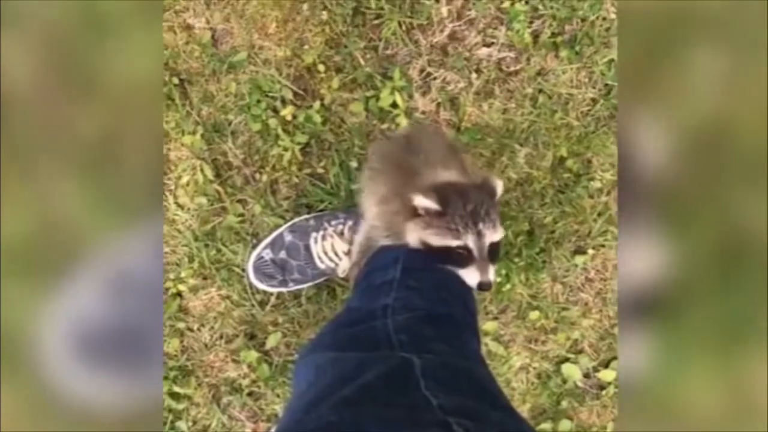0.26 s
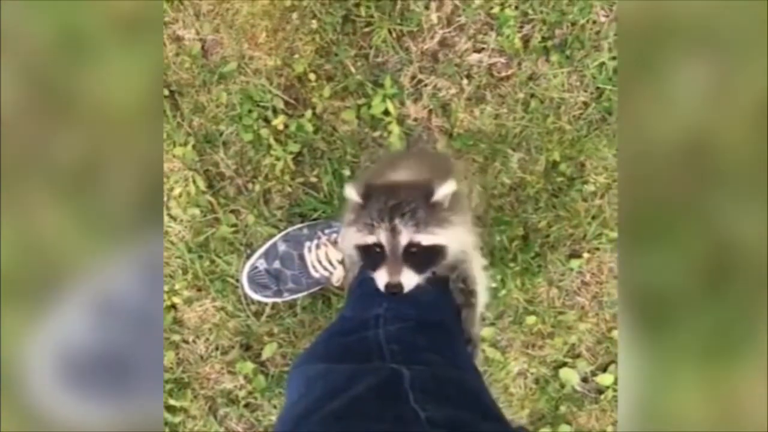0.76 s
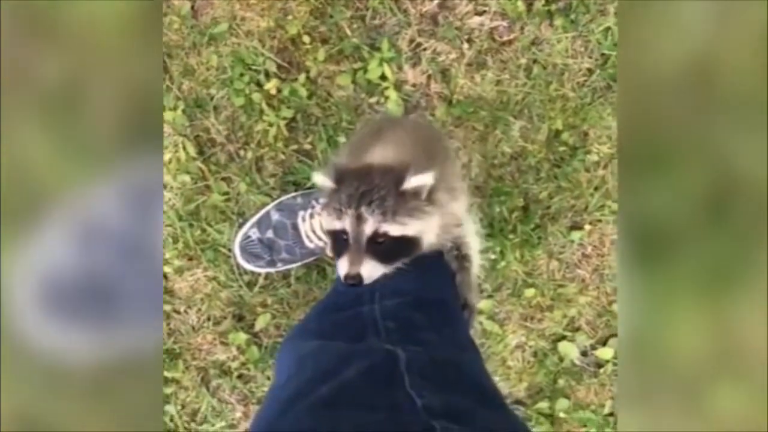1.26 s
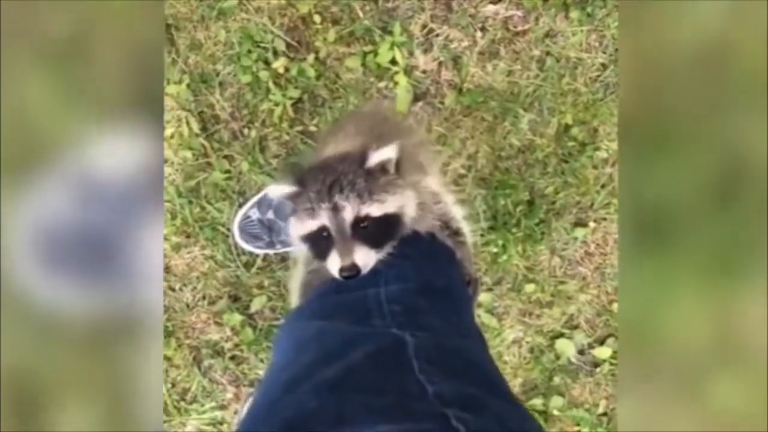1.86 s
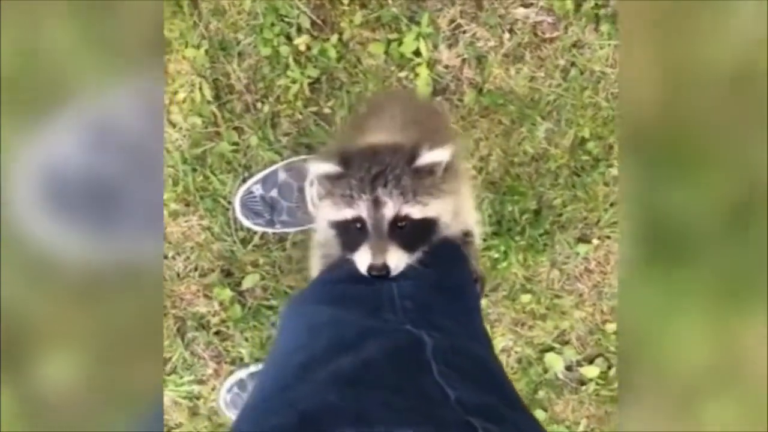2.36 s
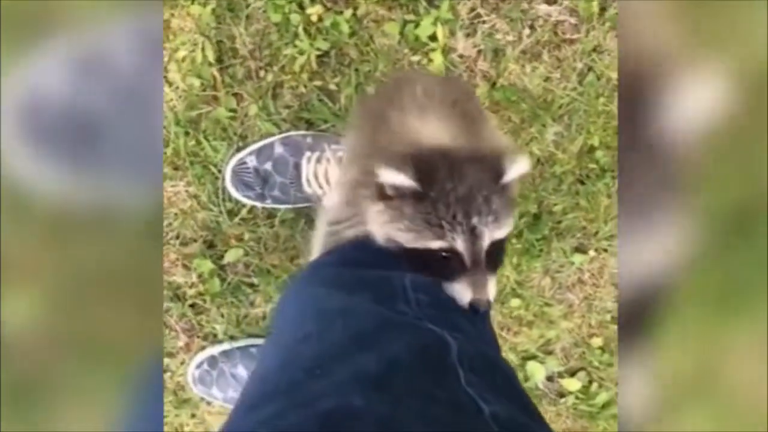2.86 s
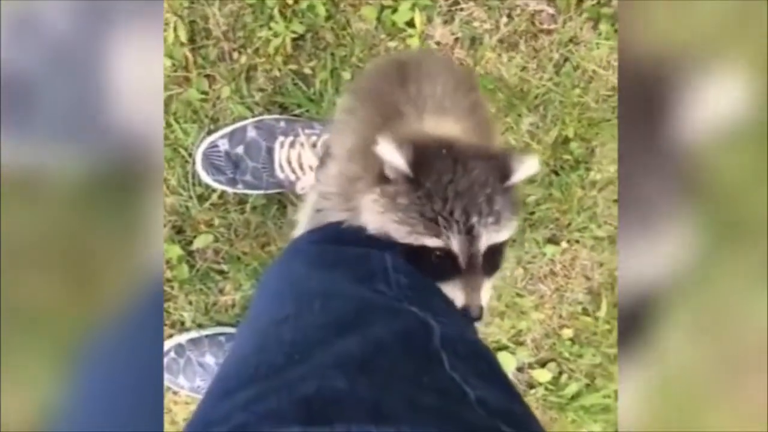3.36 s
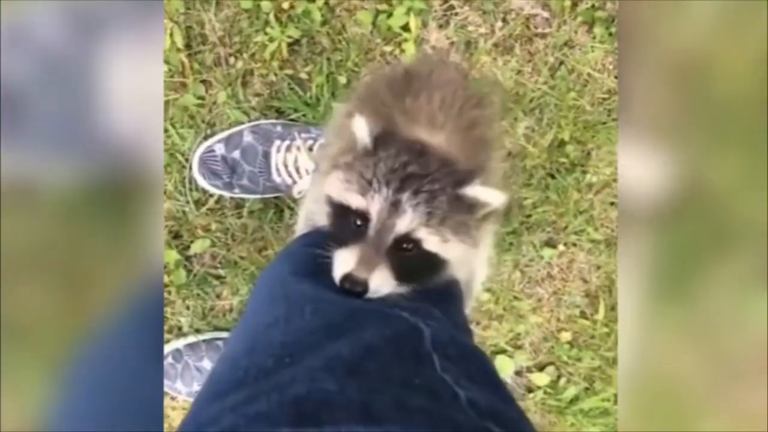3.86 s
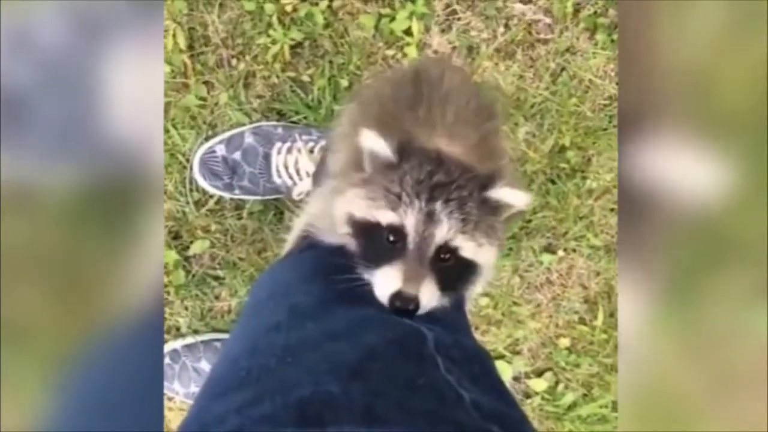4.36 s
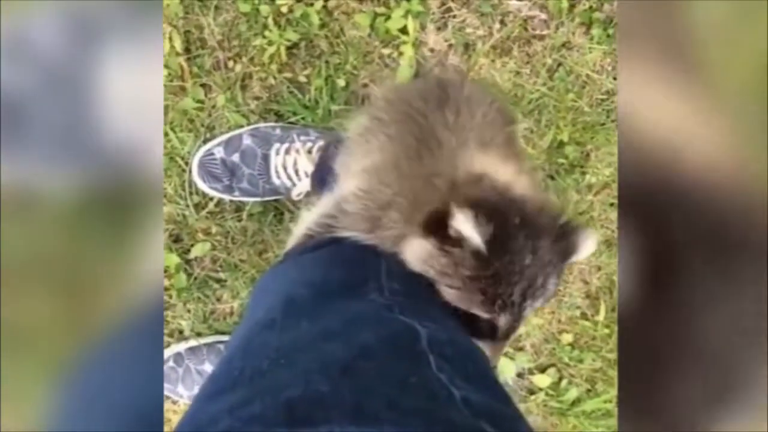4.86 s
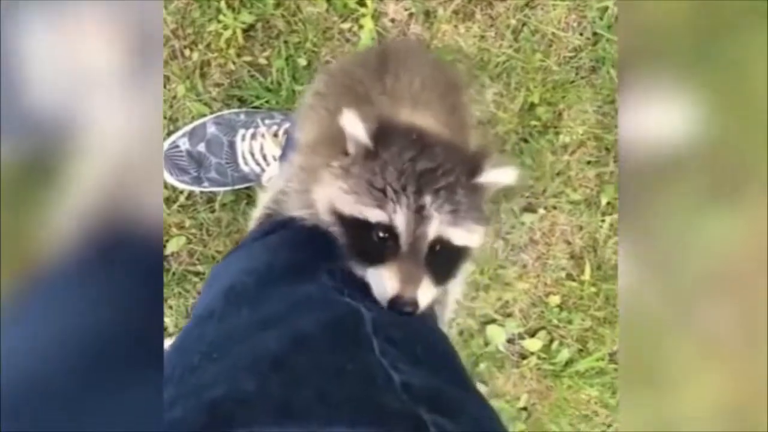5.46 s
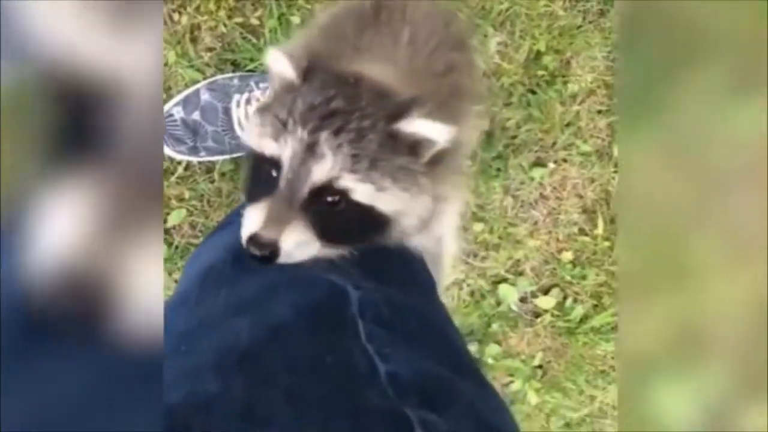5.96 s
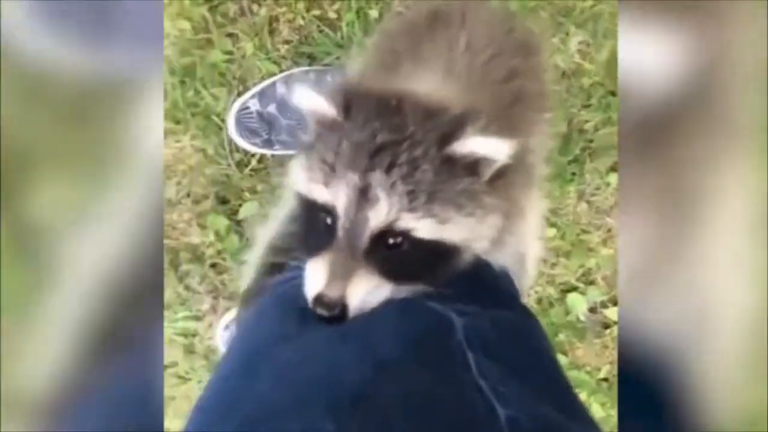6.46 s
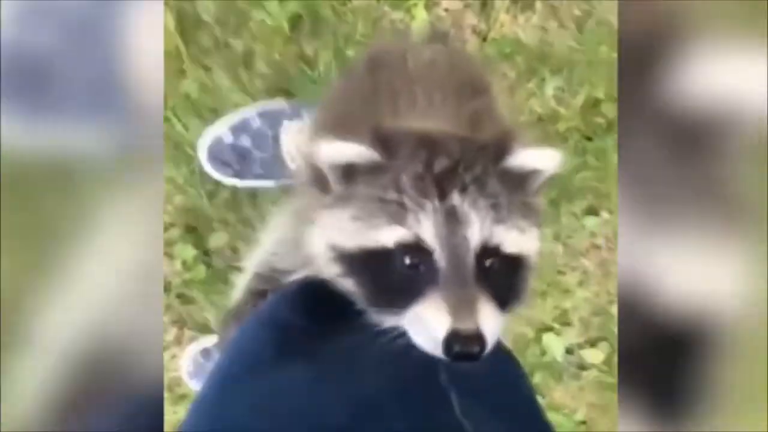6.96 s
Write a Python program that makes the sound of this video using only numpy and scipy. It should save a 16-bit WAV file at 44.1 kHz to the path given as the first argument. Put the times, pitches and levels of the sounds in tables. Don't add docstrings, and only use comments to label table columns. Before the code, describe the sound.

A young raccoon just below a phone microphone gives several short, fast-fluttering chitters mixed with thin squeaks, separated by quiet pauses. A longer trill follows, then a last, closer and louder call with a hard claw tick, a knock and a brief snort. Soft paw thuds on cloth, grass rustle, wind bumps and faint distant traffic sit around it.

```python
import sys
import numpy as np
from scipy import signal
from scipy.fft import rfft, irfft
from scipy.io import wavfile
from scipy.ndimage import uniform_filter1d

SR = 44100
rng = np.random.default_rng(int(sys.argv[2]) if len(sys.argv) > 2 else 0)


def file_out(sig):
    cols = np.atleast_2d(sig).T
    lim = np.clip(cols, -1, 1)
    pcm = np.round(lim * 32767).astype(np.int16)
    wavfile.write(sys.argv[1], SR, pcm)


def natural_amplitude(level_db):
    exponent = np.asarray(level_db, float) / 20
    return 10 ** exponent


N = 318402
TIME = np.arange(N) / SR

# [t/s, fundamental peak/dB, mouth ring peak/dB, pitch f/Hz]
SHORT_CALLS = [(.0479, -28.5, -34.5, 664), (.1029, -45, -49, 810), (.1538, -30, -35.5, 732),
               (.2088, -39.5, -46, 680), (.2607, -29.5, -30.5, 735), (.3188, -34.5, -34, 670),
               (.3724, -29.5, -32.5, 680), (.4306, -28, -34.5, 673), (.5042, -44, -38, 810),
               (1.0219, -52, -37, 674), (1.0732, -53, -22.5, 680), (1.1309, -29, -18, 655),
               (1.1988, -33.5, -23, 646), (2.5344, -41.5, -49, 650), (2.5814, -44, -42.5, 610),
               (2.636, -36, -37, 696), (2.6967, -38.5, -29.5, 792), (2.7571, -25, -23, 653),
               (2.8163, -36, -31.5, 650), (2.8743, -22, -21, 666), (2.936, -33.5, -33.5, 740),
               (3.4705, -40, -59, 647), (3.5179, -26.5, -32.5, 693), (3.579, -40.5, -33, 650),
               (3.6385, -26.5, -21, 618), (3.6905, -32, -25.5, 613), (3.7508, -26, -21, 603.5),
               (4.0442, -52, -50, 760)]
# [t/s, fundamental peak/dB, mouth ring peak/dB, pitch f/Hz]
TRILL = [(4.4103, -39.5, -41, 600), (4.45, -37.5, -31.5, 784), (4.5027, -40.5, -32.5, 653),
         (4.5536, -37.5, -24.5, 683), (4.6059, -37.5, -26, 674), (4.6583, -42, -23.5, 700),
         (4.7086, -35, -26, 692), (4.7611, -54, -46, 604), (4.8084, -34, -30, 668),
         (4.8608, -34.5, -33, 650), (4.9137, -36.5, -31.5, 658), (4.9671, -34.5, -33.5, 625),
         (5.029, -50, -37.5, 596), (5.0763, -37, -32.5, 643), (5.1347, -33.5, -34, 633),
         (5.195, -32, -34, 610), (5.248, -33.5, -27, 628), (5.304, -39.5, -26, 595),
         (5.36, -40.5, -25.5, 542), (5.3896, -52, -35, 746)]
# [t/s, fundamental peak/dB, mouth ring peak/dB, pitch f/Hz]
LAST_CALL = [(5.979, -39, -36.5, 627), (6.0344, -31, -23.5, 598), (6.0918, -26.5, -21, 604),
             (6.1502, -27.5, -25, 646), (6.2078, -24.5, -17.5, 634), (6.2649, -28, -27, 754),
             (6.3211, -29.5, -18, 587), (6.3783, -31.5, -21.5, 610), (6.4428, -31, -23.5, 620),
             (6.5055, -51, -44, 670), (6.5785, -33.5, -38, 750), (6.6386, -28, -26, 753),
             (6.699, -45, -28, 776), (6.827, -37, -26, 710)]
# [t/s, level/dB, mouth resonance f/Hz]
AIR = [
    [(0.0, -65, 1396), (0.362, -51, 1320), (0.55, -43, 1770)],
    [(1.0, -59, 1402), (1.132, -42, 1407), (1.26, -52, 1520)],
    [(2.5, -75, 1148), (2.78, -49, 1558), (3.0, -48, 1327)],
    [(3.45, -65, 1427), (3.666, -51, 1380), (3.76, -44, 1420), (3.82, -56, 1420)],
    [(4.38, -83, 1420), (4.476, -49, 1420), (4.67, -47, 1443)],
    [(4.67, -46.5, 1480), (5.11, -46.5, 1368), (5.21, -40.5, 1630), (5.45, -52.5, 1596)],
    [(5.95, -56, 1580), (6.16, -43, 1580), (6.2, -41, 2056), (6.27, -39, 2070), (6.38, -41.5, 1800),
     (6.818, -43.5, 1704), (7.0, -40, 2035)],
]
# [top of rasp f/Hz, rasp in flaps/dB, low rasp rel/dB, upper partials/dB]
RASPS = [(2000, -12, 2, 4), (2300, -19, -11, -12), (2200, -13, 1.5, -33), (2192, -17.5, -7, -12),
         (2270, -20.5, -4, -24), (3360, -12.5, -4.5, -5), (2453, -12, -3, -12)]
# [rise share, mouth glide/(Hz/s), rasp before the snap/dB,
# second and third partial/dB, delay/ms]
SNAPS = [(.5, -5000, -11, -14, .8), (.61, -12000, -9, -20, 1.2), (.4, -15000, -11, -14, -.6),
         (.5, -12000, -11, -14, .6), (.61, -8000, -11, -20, 1.2), (.61, -8000, -12, -9, 1.2),
         (.75, -30000, -13, -10, .8)]
# [flap length at -28 dB/ms, squeak octave rel/dB, mouth ring length share,
VOICING = [(8, -1, 1.26, 0.57, -12, -13), (9.5, -7, 1.3, 0.8, -9, -25), (3.5, -15, 1.43, 0.5, -18, -25),
           (6.5, -15, 0.94, 0.54, -15, -25), (10, -15, 1.43, 0.51, -10, -23), (11.5, 0, 1.2, 0.95, -3, -17),
           (5.5, 5.5, 1.1, 0.64, -30, -36)]
# [t/s, length/s, start f/Hz, end f/Hz, peak
# level/dB]
SQUEAKS = [(0.466, 0.049, 1454, 1510, -40.5), (0.489, 0.027, 1800, 1950, -36.5),
           (0.186, .02, 2450, 2350, -49), (1.014, 0.0099, 2040, 1880, -45), (1.050, 0.023, 1290, 1110, -36),
           (1.068, .011, 1130, 1500, -33), (1.096, 0.02, 1085, 1290, -46), (1.109, .023, 1440, 2000, -33),
           (1.151, 0.028, 1480, 1620, -35.5), (1.177, 0.023, 1410, 1900, -30.5),
           (1.213, 0.01, 1620, 1780, -44), (3.499, .028, 680, 700, -36), (3.634, .009, 5400, 5400, -52),
           (3.746, .01, 5400, 5400, -50), (4.83, .07, 4250, 4100, -54), (3.499, .028, 680, 700, -36),
           (3.634, .009, 5400, 5400, -52), (3.746, .01, 5400, 5400, -50)]
# [t/s, length/s, start f/Hz, end f/Hz, peak level/dB]
LATE_SQUEAKS = [(4.83, .07, 4250, 4100, -54), (4.485, .018, 1150, 1050, -45),
                (4.534, 0.026, 1087, 1150, -37.5), (4.584, 0.016, 1430, 1310, -39),
                (4.640, .028, 1158, 1203, -42), (4.68, 0.036, 1480, 1590, -37),
                (4.731, .038, 1390, 1135, -47), (4.74, .024, 2680, 2360, -46),
                (4.687, 0.02, 3055, 3220, -46), (4.683, 0.038, 4500, 4580, -46.5),
                (4.788, .02, 2750, 2660, -48), (4.78, .022, 3250, 3220, -47), (4.89, 0.02, 2680, 2590, -48),
                (5.055, .025, 3150, 3060, -48), (5.23, 0.024, 1380, 1360, -41),
                (5.283, 0.027, 1540, 1540, -38), (5.317, .054, 1526, 1443, -43),
                (6.014, .014, 1180, 1000, -52), (6.128, 0.026, 1240, 973, -42),
                (6.07, .018, 1200, 1020, -50), (6.185, .018, 1180, 1020, -47),
                (6.56, .025, 2330, 2250, -44), (6.36, 0.022, 1190, 1030, -37),
                (6.374, .016, 3350, 3300, -50), (6.493, .018, 3400, 3350, -51),
                (6.432, 0.011, 1160, 1040, -42), (6.493, .02, 1145, 1120, -42),
                (6.55, .032, 1100, 928, -46), (6.609, 0.044, 1220, 1143, -51),
                (6.798, .018, 2420, 2380, -33), (4.9, .02, 4150, 4100, -50), (5.34, .022, 2650, 2550, -44),
                (5.385, .04, 2750, 2600, -47)]
# [t/s, level/dB]
SPITS = [(.0479, -56), (.1538, -57), (.2607, -55), (.4306, -57), (1.1309, -54), (3.6385, -52),
         (3.7508, -52), (6.2078, -46), (6.287, -48), (6.3211, -49), (6.6386, -49)]
# [t/s, length/s, hiss level/dB, low body rel/dB]
SNORTS = [(2.306, 0.31, -71.5, 13.5), (6.685, 0.026, -42, -2), (6.699, 0.084, -23, 1.5),
          (6.757, 0.12, -41, 1.5), (6.84, 0.075, -47.5, 10.5), (6.888, 0.06, -45, 12.5),
          (3.627, 0.23, -57, 0.5), (-.4, .95, -56, -12)]
# [f/Hz, density/dB]
SNORT_COLOUR = [(880, -5), (1500, -5.5), (2140, -18), (2690, -13.5), (3170, -10.5), (4810, -15),
                (5600, -10), (7000, -15.5), (8000, -29), (11200, -32), (12000, -35), (15600, -52),
                (22000, -120)]
# [t/s, length/s, level/dB, centre f/Hz]
SCRATCHES = [(6.775, .065, -40, 6700), (6.87, .07, -48, 11300), (3.745, .012, -52, 7000),
             (3.633, .012, -54, 7500), (6.955, .03, -52, 8000), (6.69, .02, -46, 6300)]
# [t/s, peak level/dB, ring f/Hz, crack rel/dB]
TICKS = [(6.265, -13, 2240, -17), (6.277, -9, 2300, -23), (6.2768, -20, 7500, -30), (6.7305, -8, 800, -20),
         (6.735, -18, 1300, -20), (6.743, -24, 1300, -26), (6.755, -20, 1000, -26), (6.739, -21, 1050, -26),
         (6.749, -18, 1140, -25), (7.084, -32.5, 1800, -22)]
# [t/s, peak level/dB]
THUDS = [(2.4, -50.5), (2.754, -46), (2.873, -47), (4.041, -47.5), (4.87, -47), (5.802, -50),
         (6.271, -36.5), (6.637, -40), (6.72, -36), (7.087, -48)]
# [t/s, thump level/dB, rise/s, fall/s, flutter rel/dB]
WIND = [(0., -60, 0.038, 0.074, -4), (4.36, -38, 0.0057, 0.065, -44), (4.5, -23.5, 0.0087, 0.0065, -33),
        (4.6, -33.5, .025, 0.016, -47), (4.89, -28.5, 0.04, 0.024, -43), (5.5, -29.5, 0.03, .05, -23),
        (5.65, -27.5, 0.026, 0.024, -17), (5.83, -39.5, .025, 0.059, -14), (6.09, -39, 0.0077, .04, -29),
        (6.25, -29, 0.036, 0.038, -11), (6.5, -34.5, 0.036, 0.013, -13), (6.82, -38, 0.091, 0.038, -6),
        (6.91, -42, 0.032, 0.036, 5), (6.96, -44, 0.022, 0.0063, 7), (7.1, -42, 0.029, 0.017, -6)]
# [t/s, peak level/dB, f/Hz]
SLAPS = [(6.95, -18, 56), (7.095, -27, 62)]
# [t/s, rustle level/dB]
RUSTLE = [(0.0, -60), (.54, -61), (1.2, -60), (1.55, -61), (2.09, -59), (2.39, -55), (3.04, -57),
          (3.22, -62), (4.5, -62.5), (5.35, -54.5), (5.8, -58.5), (6.19, -54), (6.35, -46.5), (6.66, -53.5),
          (6.82, -50), (6.93, -44), (6.945, -57), (7.22, -60.5)]
# [f/Hz, density/dB]
RUSTLE_COLOUR = [(1180, -31), (2000, 2.5), (2410, -6), (2650, 0), (2860, -1.5), (4940, 0.5), (8050, 0.5),
                 (10300, -3), (13400, -20), (22000, -120)]
# [t/s, level/dB]
ROAD = [(0.0, -48), (.8, -52), (2.3, -54), (3.4, -54), (4.35, -55.5), (4.7, -52.5), (5.35, -55.5),
        (5.9, -52.5), (6.75, -53.5), (6.9, -55), (7.22, -61)]
# [f/Hz, density/dB]
TRAFFIC = [(240, -15.5), (400, -11.5), (577, -2), (623, -1.5), (748, -1), (1060, 1), (1730, -10),
           (1980, -15), (2240, -14.5), (4000, -20.5), (5200, -25), (8800, -120)]
# [t/s, level/dB]
DRONE = [(0., -68), (.9, -63), (1.2, -52.5), (1.6, -58), (2.4, -57.5), (2.9, -64), (3.3, -68), (4.1, -59),
         (4.4, -76), (7.22, -78)]
THINNED = [.195, .268, .509, .593, .865, .915, .955, 1.043, 1.447, 1.49, 1.594, 1.944, 2.03, 2.11, 2.555,
           2.645, 2.703, 2.937, 3.035, 3.065, 3.16, 4.697, 4.866, 5.195, 5.243, 5.327, 5.84, 6.079, 6.563,
           6.957, 7.015]
WORST_THINNED = [.865, .915, 2.645, 5.195]

HARD_SNAP_DB, HARD_RISE = -19, .35
FLAP_MS_PER_DB, MOUTH_SCATTER_HZ = 0.7, 61
OCTAVE_FADES_HZ, OCTAVE_DB_PER_KHZ = 1310, -40
SQUEAK_BEND, HIGH_ROUGH = .7, .42
AIR_SHUT_DB, AIR_LEAD_S = -9, .01
THUD_RISE_S, THUD_FALL_S = 0.0067, 0.011
CALM_DB, CALM_FLUTTER_DB = -49.5, -56
FINE_DB, FINE_SLOPE, FINE_FULL_DB = -69.5, 3.3, -57.5
MURMUR_DB, MURMUR_SLOPE = -61, 0.82
TRAFFIC_DB = 1
SPARED_HZ, SPARED_OVER_CALL_HZ = 1800, 148
TOP_HZ = 12100


def noise(colour):
    hz, db = np.transpose(colour)
    grid = np.log(np.fft.rfftfreq(N, 1 / SR) + 1)
    gain = natural_amplitude(np.interp(grid, np.log(hz), db, -120, -120))
    x = irfft(rfft(rng.standard_normal(N)) * gain, N)
    return x / x.std()


def walk(rate):
    k = int(SR / rate)
    held = np.repeat(rng.standard_normal(N // k + 1), k)
    return 1.3 * uniform_filter1d(uniform_filter1d(held, k), k)[:N]


def curve(table, column):
    rows = np.array(table)
    return np.interp(TIME, rows[:, 0], rows[:, column], -120, -120)


def add(out, s, piece):
    i = max(int(s * SR), 0)
    out[i:i + len(piece)] += piece[:N - i]


def swell(t, rise, fall):
    return 2 / (np.exp(np.clip(-t / rise, -50, 50)) + np.exp(np.clip(t / fall, -50, 50)))


def flaps(rough, phrase):
    out, t = np.zeros(N), np.arange(-1500, 2000) / SR
    resonance = np.max([curve(table, 2) for table in AIR], axis=0)
    rows = SHORT_CALLS + TRILL + LAST_CALL
    for (s, db, mouth_db, hz), c in zip(rows, rng.random((len(rows), 9))):
        row = phrase[int(s * SR)]
        top_hz, rough_db, _, upper_db = RASPS[row]
        flap_ms, _, ring_share, voice_rise, _, _ = VOICING[row]
        snap_rise, glide, early_db, partial_db, delay_ms = SNAPS[row]
        mouth_hz = max(resonance[int(s * SR)], 1180) + MOUTH_SCATTER_HZ * (2 * c[8] - 1)
        ms = flap_ms + FLAP_MS_PER_DB * (max(db, mouth_db - 10.0) + 28.0)
        flank = max(ms, 5.4) / 2630
        phase, turn = 2 * np.pi * hz * (t - 0.4 * t ** 2), 2 * np.pi * c
        opening = np.tanh(2.36 * swell(t, voice_rise * flank, 0.57 * flank))
        opening += natural_amplitude(-18.5) * swell(t, 0.012, 0.018)
        voice = natural_amplitude(db) * opening * np.sin(phase + turn[0])

        hard = mouth_db > HARD_SNAP_DB and row == 6
        held = ring_share * flank
        late = t - delay_ms / 1000 + .002 * hard
        snap = np.tanh(1.52 * swell(late, snap_rise * held * HARD_RISE ** hard, 0.31 * held * (1 + hard)))

        struck = 1 + .28 * np.cos(phase + turn[1])
        bend = glide * np.clip(t, -.02, .02) ** 2 / 2
        mouth = struck * np.sin(2 * np.pi * (mouth_hz * t + bend) + turn[2])
        mouth += natural_amplitude(partial_db) * (np.sin(2 * phase + turn[3]) + np.sin(3 * phase + turn[8]))
        mouth += .33 * np.sin(2 * np.pi * (mouth_hz + 700 * (c[3] - .5)) * t + turn[7])
        mouth += natural_amplitude(-20.5) * (mouth_hz < 1560) * np.sin(2 * np.pi * 2700 * t + turn[1])
        for k in (4, 5, 6):
            shut_db = -18 * (k * hz > 1.1 * top_hz)
            mouth += natural_amplitude(upper_db - 3.3 * (k - 4.0) + shut_db) * np.sin(k * phase + turn[k])

        voice += natural_amplitude(db - 35) * snap * np.sin(2 * np.pi * (3600 + 700 * c[8]) * t)
        voice += natural_amplitude(db - 20) * snap * np.sin(.62 * phase + turn[7])
        voice += natural_amplitude(db - 13) * snap * np.sin((1.25 + .25 * c[3]) * phase + turn[6])
        start = s + t[0]
        gate = swell(t, 0.0036, 0.0051) + natural_amplitude(early_db) * swell(t + 0.0097, 0.0077, 0.0082)
        breath = natural_amplitude(rough_db) * gate * np.roll(rough, -int(start * SR))[:len(t)]
        add(out, start, voice + natural_amplitude(mouth_db - 3.0) * (snap * mouth + breath))
    return out


def squeaks(phrase):
    out, shiver = np.zeros(N), walk(350) + 1j * walk(350)
    rows = SQUEAKS + LATE_SQUEAKS
    for (s, length, hz0, hz1, db), turn in zip(rows, rng.random(len(rows))):
        u = np.linspace(0, 1, int(length * SR))
        span = slice(int(s * SR), int(s * SR) + len(u))
        _, octave_db, _, _, _, third_db = VOICING[phrase[span.start]]
        octave_db += OCTAVE_DB_PER_KHZ * max(max(hz0, hz1) - OCTAVE_FADES_HZ, 0) / 1000
        rough = .07 if min(hz0, hz1) < 1270 else HIGH_ROUGH
        unsteady = 1 - rough + rough * shiver[span]
        hz = hz0 + (hz1 - hz0) * u ** SQUEAK_BEND
        spin = np.exp(2j * np.pi * (np.cumsum(hz) / SR + turn))
        tone = spin * unsteady
        tone += natural_amplitude(octave_db) * spin ** 2 * unsteady
        tone += natural_amplitude(octave_db + third_db) * spin ** 3
        out[span] += natural_amplitude(db) * np.sin(np.pi * u ** 1.3) ** .45 * tone.real
    return out


def rasp():
    sound, phrase = np.zeros(N), np.zeros(N, int)
    for k, (table, (top_hz, _, low_db, _)) in enumerate(zip(AIR, RASPS)):
        inside = (TIME >= table[0][0]) & (TIME < table[-1][0])
        colour = [(350, -30), (600, low_db - 4), (.46 * top_hz, low_db + 3), (.6 * top_hz, low_db - 1),
                  (.76 * top_hz, 0), (.86 * top_hz, -6), (.97 * top_hz, -1), (1.1 * top_hz, -25),
                  (1.25 * top_hz, VOICING[k][4]), (1.36 * top_hz, -30)]
        sound += inside * noise(colour)
        phrase += inside * k
    return sound, phrase


def air(wide):
    out, opening, t = np.zeros(N), np.zeros(N), np.arange(-2500, 2500) / SR
    for row in SHORT_CALLS + TRILL + LAST_CALL:
        add(opening, row[0] - AIR_LEAD_S + t[0], swell(t, 0.013, 0.01))
    narrow = signal.hilbert(noise([(1, 3), (200, -1), (500, -12), (800, -30)]))
    flutter = natural_amplitude(3.5 * walk(80) + 3.0 + AIR_SHUT_DB * (1 - np.minimum(opening, 1)))
    for table in AIR:
        cycles = np.cumsum(np.maximum(curve(table, 2), 0)) / SR
        ring = np.real(narrow * np.exp(2j * np.pi * cycles))
        out += natural_amplitude(curve(table, 1)) * flutter * natural_amplitude(-10.0) * (ring + wide)
    return out


def spits():
    shape = sum(natural_amplitude(db) * swell(TIME - s, .0012, .002) for s, db in SPITS)
    return shape * noise([(2600, -30), (3300, 0.5), (5500, -1), (8000, -7), (11000, -16)])


def snort():
    grain = natural_amplitude(2.2 * walk(400))
    hiss = grain * noise(SNORT_COLOUR)
    body = grain * noise([(100, -7.0), (300, 1.5), (700, 1.5), (1150, -8), (1600, -7.5), (2500, -7.5)])
    fizz = grain * noise([(6500, -30), (8000, 0.5), (11000, -2), (12200, -8)])
    out = np.zeros(N)
    for s, length, db, body_db in SNORTS:
        u = np.clip((TIME - s) / length, 0, 1)
        arch = np.sin(np.pi * u)
        breath = arch ** 1.24 * hiss
        breath += natural_amplitude(-14) * arch ** 2.6 * fizz
        breath += natural_amplitude(body_db) * np.sin(np.pi * u ** 1.08) ** 2.1 * body
        out += natural_amplitude(db) * (u < 1) * breath
    band = noise([(1, 0), (700, -3), (1300, -25)])
    for s, length, db, hz in SCRATCHES:
        stroke = np.sin(np.pi * np.clip((TIME - s) / length, 0, 1))
        out += natural_amplitude(db) * stroke * band * np.cos(2 * np.pi * hz * TIME)
    return out


def ticks():
    out, t = np.zeros(N), np.arange(600) / SR
    for (s, db, hz, crack_db), grit in zip(TICKS, rng.standard_normal((len(TICKS), len(t)))):
        ring = np.exp(-t * hz / (0.6 if hz > 1500 else 2.2)) * np.sin(2 * np.pi * hz * t)
        ring *= 1.4 * (1 - np.exp(-t / .00007))
        crack = np.exp(-t / .0003) * uniform_filter1d(grit, size=5)
        add(out, s + .0015, natural_amplitude(db + 4) * (ring + natural_amplitude(crack_db + 8) * crack))
    return out


def thuds():
    shape = sum(natural_amplitude(db) * swell(TIME - s, THUD_RISE_S, THUD_FALL_S) for s, db in THUDS)
    return shape * noise([(120, -19), (200, 1.0), (330, -6.0), (600, -8.0), (900, -43)])


def wind():
    thump = noise([(12, -5.5), (25, -4.5), (34, -4.0), (41, 3.5), (50, -4), (65, -7.5), (90, -29.0)])
    flutter = natural_amplitude(2.0 * walk(28)) * noise([(50, -10.5), (75, 3.0), (120, -4.0), (160, -9.5), (230, -23.0)])
    out = natural_amplitude(CALM_DB) * thump + natural_amplitude(CALM_FLUTTER_DB) * flutter
    for s, db, rise, fall, flutter_db in WIND:
        out += natural_amplitude(db) * swell(TIME - s, rise, fall) * (thump + natural_amplitude(flutter_db) * flutter)
    for s, db, hz in SLAPS:
        out += natural_amplitude(db) * swell(TIME - s, .007, .009) * np.cos(2 * np.pi * hz * (TIME - s))
    return out


def leaves(rustle_db):
    flicker_db = 1.22 * walk(24.83) + 1.1 * walk(9.9)
    rustle = natural_amplitude(rustle_db + 1.0 + flicker_db) * noise(RUSTLE_COLOUR)
    fine_db = FINE_DB + FINE_SLOPE * (np.minimum(rustle_db, FINE_FULL_DB) + 59)
    fine = noise([(9800, -43), (10600, 2.0), (11300, 2), (11950, 2), (12400, -15)])
    return rustle + natural_amplitude(fine_db - 2.0 + 2.3 * walk(13)) * fine


def road(stir):
    roar = natural_amplitude(curve(ROAD, 1) + TRAFFIC_DB + 1.6 * walk(15)) * noise(TRAFFIC)
    drone = natural_amplitude(curve(DRONE, 1)) * noise([(80, -30), (92, -5), (97, -0.5), (103, -2), (118, -30)])
    murmur = noise([(110, -16), (170, -0.5), (320, 1.0), (430, -4.5), (520, -39)])
    return roar + drone + natural_amplitude(MURMUR_DB + MURMUR_SLOPE * stir + 2 * walk(10)) * murmur


def scene():
    throat, phrase = rasp()
    voice = flaps(throat, phrase) + squeaks(phrase) + air(throat) + spits()
    body = snort() + ticks() + thuds()
    rustle_db = curve(RUSTLE, 1)
    background = wind() + leaves(rustle_db) + road(rustle_db + 59.5)
    return (voice + body + background)[None]


def thin_treble(x):
    for s, c in zip(THINNED, rng.random((len(THINNED), 220))):
        worst = s in WORST_THINNED
        size = 1700 if worst else 1150
        window, hz = signal.windows.tukey(size, .75), np.fft.rfftfreq(size, 1 / SR)
        i = int(s * SR) - size // 2
        calls = [row[0] + SPARED_OVER_CALL_HZ for table, row in zip(AIR, RASPS)
                 if table[0][0] < s < table[-1][0]]
        low_hz = SPARED_HZ if worst else max(calls + [SPARED_HZ])
        treble = (hz > low_hz) & (hz < 10500)
        emptied = treble & (c[(hz // 110).astype(int)] > (.15 if worst else .2))
        emptied |= (hz > 170) & (hz < 480) & worst
        kept = treble & ~emptied
        loss_db = -32 if worst else -20 - 8 * c[0]
        change = (natural_amplitude(5) - 1) * kept - (1 - natural_amplitude(loss_db)) * emptied
        x[0, i:i + size] += window * irfft(rfft(x[0, i:i + size]) * change, size)
    return x


def band_limit(x):
    return signal.sosfilt(signal.butter(12, 12530, fs=SR, output="sos"), x)


def record(dry):
    x = thin_treble(dry.copy())
    for _ in range(2):
        edge = signal.sosfiltfilt(signal.ellip(6, .1, 50, 11750, "high", fs=SR, output="sos"), x)
        x = x - np.clip(2 * walk(25) - .3, 0, 1) * edge
    x = signal.sosfilt(signal.ellip(10, .2, 80, TOP_HZ, fs=SR, output="sos"), x)
    return band_limit(x)


dry = scene()
out = record(dry)
file_out(out)
```